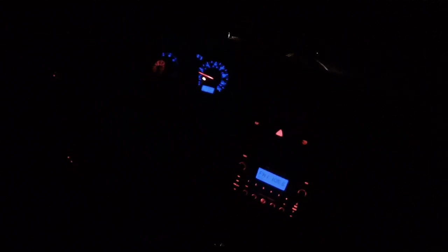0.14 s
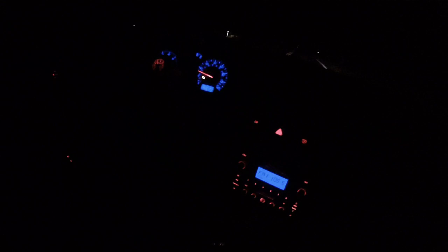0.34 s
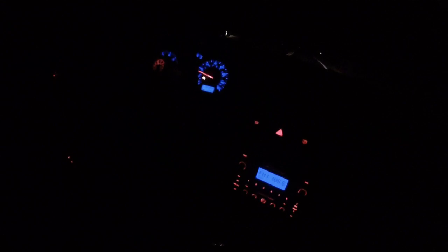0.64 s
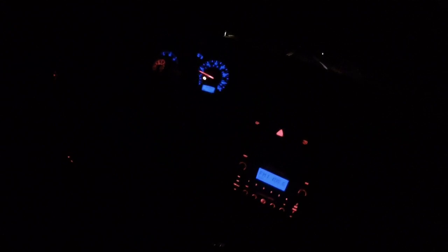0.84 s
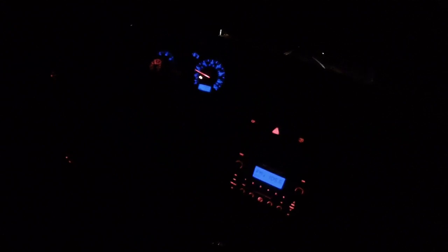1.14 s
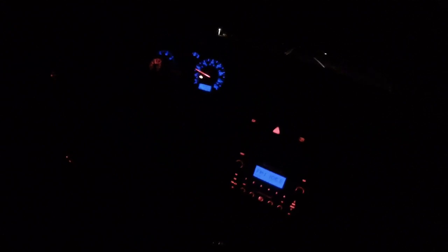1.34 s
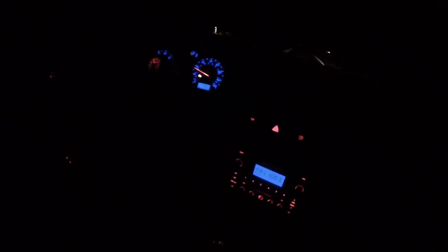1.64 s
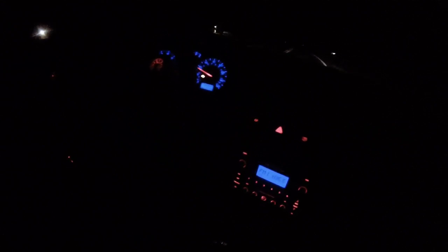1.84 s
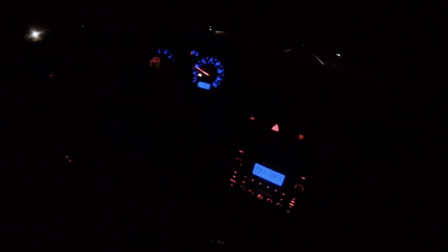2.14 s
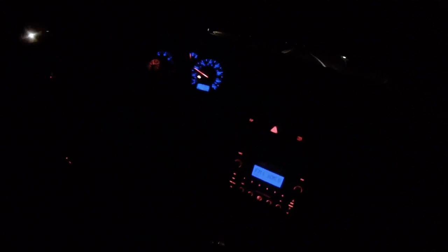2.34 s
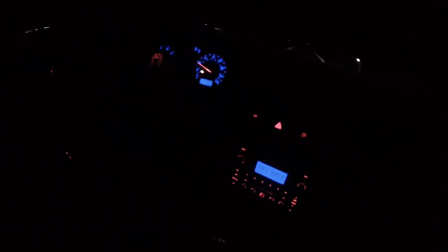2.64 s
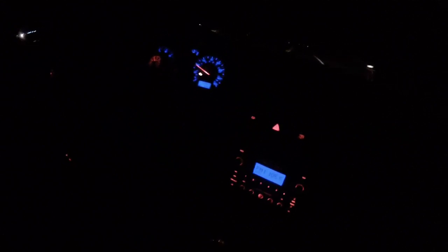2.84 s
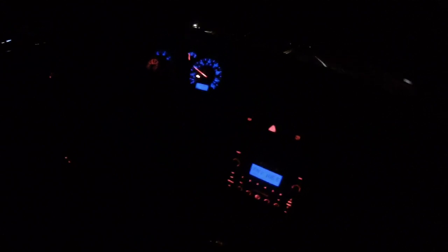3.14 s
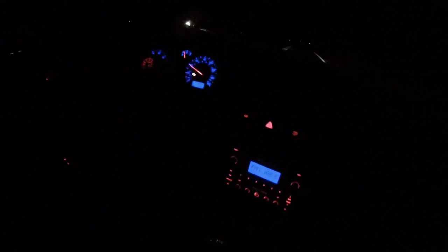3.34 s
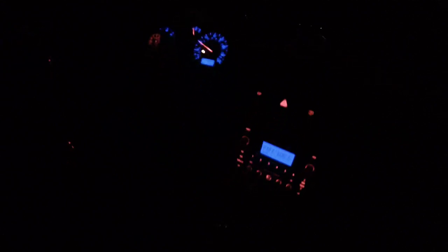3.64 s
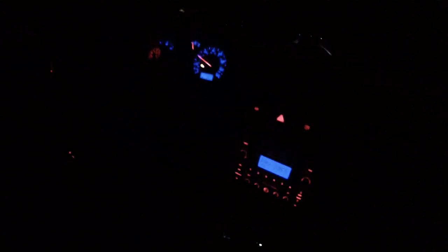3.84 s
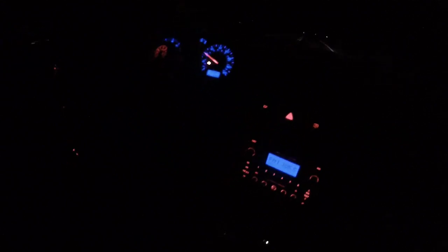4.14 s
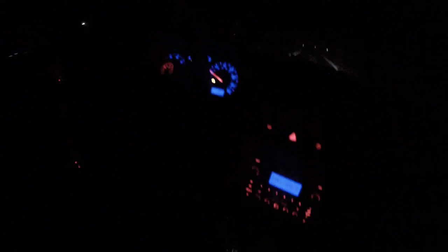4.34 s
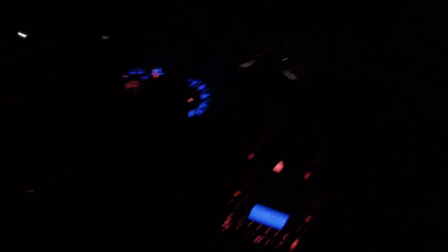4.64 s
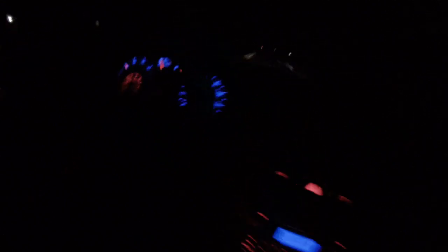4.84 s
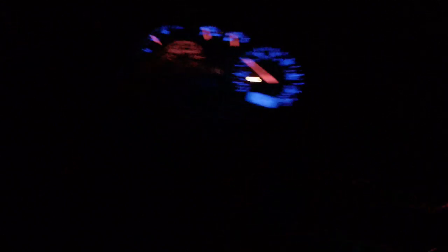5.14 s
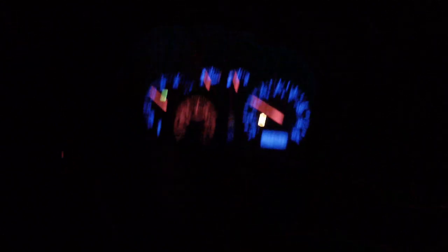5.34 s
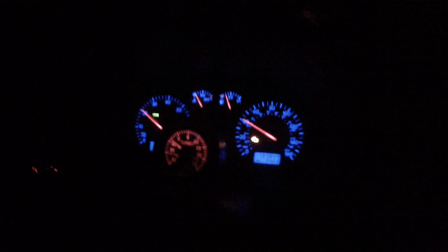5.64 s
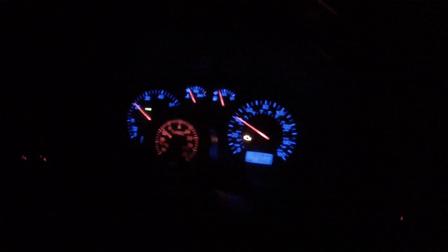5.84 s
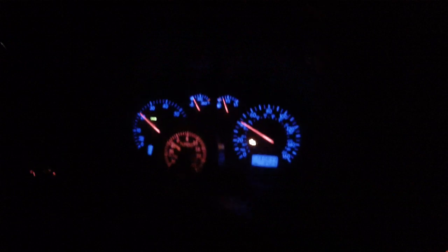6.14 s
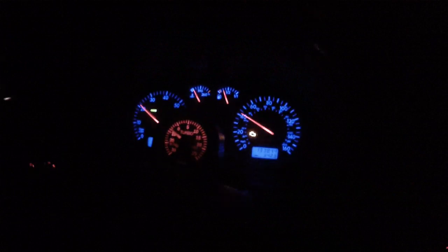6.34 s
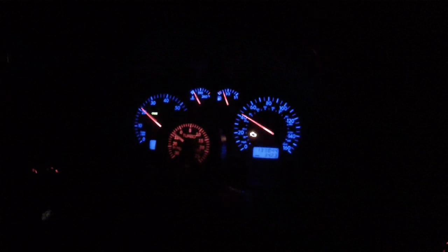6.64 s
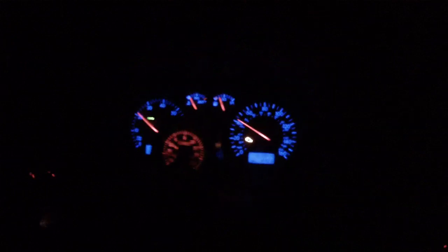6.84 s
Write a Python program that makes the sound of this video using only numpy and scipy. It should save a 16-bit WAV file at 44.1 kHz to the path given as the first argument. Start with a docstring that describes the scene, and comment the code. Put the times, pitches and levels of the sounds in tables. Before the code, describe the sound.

A turbocharged car engine drones inside the cabin, rising in pitch, dropping for a gear change, then pulling again over road rumble.

```python
"""A turbocharged four-cylinder engine drones and booms, heard inside the car at night. It pulls up through
a gear, falls away for the shift, blips and pulls again; its second harmonic excites the cabin's air
resonance. Wheels rumble, air rushes, trim rattles and creaks by stick-slip friction, and the turbo whistles
faintly. A small recorder overloads a little and holds each of its samples, which adds a thin whine."""
import sys
import numpy as np
from scipy import signal
from scipy.fft import rfft, irfft
from scipy.io import wavfile

SR = 44100
rng = np.random.default_rng(int(sys.argv[2]) if len(sys.argv) > 2 else 0)


def log_audio(samples):
    """Write samples as a 16-bit WAV file to the path given in sys.argv[1]."""
    # one column per channel
    frames = np.atleast_2d(samples).T
    # limit to full scale, then quantise
    limited = np.clip(frames, -1, 1)
    pcm = np.round(limited * 32767).astype(np.int16)
    wavfile.write(sys.argv[1], SR, pcm)


N = 307818
T = np.arange(N) / SR


def amp(db):
    """Converts decibels to an amplitude ratio."""
    return 10 ** (np.asarray(db) / 20)


def unit(x):
    """Normalises to rms 1."""
    return x / np.sqrt(np.mean(x ** 2) + 1e-20)


def curve(points):
    """Linear interpolation of (time [s], value) points over the scene."""
    return np.interp(T, *np.transpose(points))


def colour(x, spectrum, skirt_db_per_octave=-36):
    """Spectral shaping by (frequency [Hz], relative level [dB]) points, falling off outside them; rms 1."""
    points_hz, db = np.transpose(spectrum)
    hz = np.fft.rfftfreq(len(x), 1 / SR) + 1e-3
    octaves_outside = np.maximum(np.log2(hz / points_hz[-1]), 0) + np.maximum(np.log2(points_hz[0] / hz), 0)
    gain_db = np.interp(np.log(hz), np.log(points_hz), db) + skirt_db_per_octave * octaves_outside
    return unit(irfft(rfft(x) * amp(gain_db), len(x)))


def wander(rate_hz):
    """Low-pass noise: a slow random fluctuation, rms 1."""
    hz = np.fft.rfftfreq(N, 1 / SR)
    return unit(irfft(rfft(rng.standard_normal(N)) / (1 + (hz / rate_hz) ** 4), N))


def resonate(x, hz, width_hz):
    """Two resonators in cascade, centred on a steady or gliding frequency; rms 1."""
    carrier = np.exp(2j * np.pi * np.cumsum(hz * np.ones(len(x))) / SR)
    pole = np.exp(-np.pi * width_hz / SR)
    baseband = signal.lfilter([(1 - pole) ** 2], [1, -2 * pole, pole * pole], x / carrier)
    return unit((carrier * baseband).real)


def clicks(per_s, spread_db):
    """A Poisson process: random impulses of unequal size."""
    size = amp(spread_db * np.minimum(rng.exponential(1, N), 4))
    return size * rng.choice([-1, 1], N) * (rng.random(N) < per_s / SR)


def add(mix, start_s, sound):
    """Superposes a sound on the mix from start_s on."""
    part = mix[max(round(start_s * SR), 0):][:len(sound)]
    part += sound[:len(part)]


def resonance_db(hz, centre_hz, width_hz, peak_db):
    """Gain in dB near a resonance, as a Lorentzian bell."""
    return peak_db / (1 + (2 * (hz - centre_hz) / width_hz) ** 2)


def exhaust_levels(firing_hz, above_cruise_hz, open_s=0.062, shut_s=0.18):
    """Throb, boom and growl in dB: power follows the load, and under load a cabin mode lifts the boom."""
    # throttle presses: (opens [s], shuts [s], throb at cruise [dB], boom before resonance [dB],
    # boom decay [dB/s], growl at cruise [dB])
    presses = [(-.2, 3.3, -12, -27, 0, -14), (4.06, 4.17, -19, -33, -6, -25),
               (4.25, 7.2, -13, -28.5, 2.5, -18)]
    cabin_db = resonance_db(2 * firing_hz, centre_hz=128.9, width_hz=65, peak_db=20)
    power = amp([[-24], [-27], [-26.5]]) ** 2 * np.ones(N)  # throb, boom and growl while coasting
    for opens, shuts, throb_db, boom_db, decay_db_per_s, growl_db in presses:
        load = np.clip((T - opens) / open_s, 0, 1) * np.clip(1 - (T - shuts) / shut_s, 0, 1)
        loaded_db = [throb_db - 0.2557 * above_cruise_hz,  # the exhaust softens as the revs climb
                     boom_db + cabin_db - decay_db_per_s * (T - opens),
                     growl_db - 0.1466 * above_cruise_hz]
        power += load ** 2 * (amp(loaded_db) ** 2 - power)
    return 10 * np.log10(power)


def engine(phase, firing_hz, throb_db, boom_db, growl_db, shake=0.052, waver=0.17):
    """Periodic firing gives two strong harmonics, and weaker orders that swell at panel resonances."""
    # weak orders, the halves from unequal cylinders: (multiple of firing rate [1], level re growl [dB])
    overtones = [(1.5, -22.5), (2.5, -29.5), (3, -16.5), (3.5, -29.5), (4, -19.5), (4.5, -32.5), (5, -27.5),
                 (5.5, -29.5), (6, -33.5), (6.5, -33.5), (7, -41), (7.5, -35)]
    # cabin panel resonances: (frequency [Hz], width [Hz], peak gain [dB])
    panels = [(119, 20, 7), (218.4, 20, 7), (266.3, 22, 5.5), (430.5, 54, 8)]
    throb = amp(throb_db) * (1 + shake * wander(4.6)) * np.sin(phase)
    boom = amp(boom_db) * (1 + shake * wander(6.4)) * np.sin(2 * phase)
    growl = np.zeros(N)
    for order, db in overtones:
        hz = order * firing_hz
        lift_db = sum(resonance_db(hz, *panel) for panel in panels)
        lag = np.pi * hz / 215  # the cabin's resonances turn the phase of the upper orders, the more the higher they lie
        tone = np.sin(order * phase - lag + waver * wander(7)) * (1 + waver * wander(7))
        growl += amp(db + lift_db) * tone
    return np.sqrt(2) * (throb + boom + amp(growl_db) * growl)


def wheel_rumble(pace, bump_sigma_s=0.088):
    """Forced vibration: wheels shake the body, more with pace, on uneven tarmac and over bumps."""
    # bumps in the road: (time [s], level [dB])
    bumps = [(2.24, -21), (2.64, -22), (3.2, -14)]
    # rumble spectrum: (frequency [Hz], relative level [dB])
    spectrum = [(8, -32), (16, -9.5), (24, 3.5), (32, -8), (45, -7), (60, -11.5), (100, -44)]
    uneven_db = 2 * wander(2.6)
    rolling = amp(-24 + 7 * pace + uneven_db)
    jolts = sum(amp(db) * np.exp(-.5 * ((T - s) / bump_sigma_s) ** 2) for s, db in bumps)
    return np.hypot(rolling, jolts) * colour(rng.standard_normal(N), spectrum)


def roar(phase, pace, above_cruise_hz, pulsing=0.12):
    """Broadband noise, modulated by each firing: tyres roar with pace, the engine block with revs."""
    # roar spectrum: (frequency [Hz], relative level [dB])
    spectrum = [(35, -12), (60, -10), (130, 4), (160, -4.5), (185, -8), (235, -5.5), (310, -12),
                (430, -13.5), (540, -18.5), (670, -16.5), (870, -33), (1025, -30), (1160, -37), (1400, -54)]
    level_db = -24 + 4 * pace + 0.0686 * above_cruise_hz
    noise = rng.standard_normal(N) * (1 + pulsing * np.cos(phase))
    return amp(level_db) * colour(noise, spectrum)


def air_rush(phase, pulsing=0.1, flutter_db=0.8, gain_db=0.67):
    """Turbulence of intake and wind: noise that pulses with the firing and flutters a little."""
    # level of the rush, which grows louder late in the scene: (time [s], level before gain_db [dB])
    levels = [(0, -48.5), (1, -51), (3.2, -47.5), (4.45, -46.5), (5.1, -42), (6.98, -41)]
    # airflow spectrum: (frequency [Hz], relative level [dB])
    spectrum = [(500, -14.5), (900, -8), (1450, 2), (2100, -3.5), (2800, -10), (3600, -14), (5000, -16.5),
                (5800, -32.5)]
    turbulence = rng.standard_normal(N) * (1 + pulsing * np.cos(phase)) * amp(flutter_db * wander(30))
    return amp(curve(levels) + gain_db) * colour(turbulence, spectrum)


def dashboard_buzz(phase, above_cruise_hz, pulsing=0.075, clump_db=1.0, settle_s=5):
    """Impact noise: the engine shakes loose trim, harder with revs; late on the buzz settles a little."""
    # buzz spectrum: (frequency [Hz], relative level [dB])
    spectrum = [(900, -10), (1900, -7.5), (2400, -5), (2750, -3.5), (2920, -1.5), (3150, -5), (3600, -13),
                (3850, -10), (4030, -7.5), (4300, -12.5), (5100, -17), (5900, -34)]
    chatter = clicks(per_s=6000, spread_db=1.5)
    impacts = chatter * (1 + pulsing * np.cos(phase)) * amp(clump_db * wander(22))
    settled = np.clip((T - settle_s) / .3 + .5, 0, 1)
    level_db = -47.5 + 0.1431 * above_cruise_hz + .5 * wander(3.5) - 2.5 * settled
    return amp(level_db) * colour(impacts, spectrum)


def turbo_hiss(growl_db, lag_s=.45, relative_db=-45):
    """Flow noise of the turbo, which spools up and down behind the load with a first-order lag."""
    # hiss spectrum: (frequency [Hz], relative level [dB])
    spectrum = [(3000, -15.5), (4300, -2.5), (5000, -0.5), (5600, -3.5), (5900, -8.5)]
    pole = np.exp(-1 / (lag_s * SR))
    boost_db = growl_db[0] + signal.lfilter([1 - pole], [1, -pole], growl_db - growl_db[0])
    return amp(boost_db + relative_db) * colour(rng.standard_normal(N), spectrum)


def trim_creaks():
    """Stick-slip friction: runs of tiny slips scrape a plastic panel and excite its resonance."""
    # creaks: (time [s], duration [s], ring level [dB], ring frequency [Hz], scrape level [dB])
    creaks = [(.28, .1, -54.5, 2880, -56), (1.165, .05, -48, 2990, -57), (1.266, .07, -52, 3980, -55.5),
              (1.417, 0.055, -53, 2900, -50.5), (2.837, .08, -51, 3000, -53.5),
              (4.666, .07, -51, 2960, -53), (4.976, 0.065, -43.5, 3800, -37.5),
              (5.027, .05, -43.5, 3890, -37), (5.058, .04, -45.5, 3902, -48),
              (5.34, .035, -52.5, 3870, -59)]
    out = np.zeros(N)
    slips = clicks(per_s=1800, spread_db=2.5)
    scrape = colour(slips, [(700, -4), (1300, 0), (2900, -3), (4500, -12), (5800, -17)])
    for start, duration, ring_db, hz, scrape_db in creaks:
        part = slice(round(start * SR), round((start + duration) * SR))
        ring = amp(ring_db) * resonate(slips[part], hz, width_hz=480)
        creak = ring + amp(scrape_db) * unit(scrape[part])
        add(out, start, creak * signal.windows.tukey(len(creak), .5))
    return out


def turbo_whistles():
    """Narrow-band noise with a gliding centre: short, breathy whistles of the turbo under boost."""
    # whistles: (time [s], duration [s], level [dB], start frequency [Hz], end frequency [Hz])
    whistles = [(.78, .26, -58.5, 5700, 5560), (1.0, .2, -59.5, 5440, 5400), (1.25, .22, -63, 5660, 5600),
                (1.68, .26, -65.5, 5600, 5660), (6.44, 0.16, -62, 5540, 5570),
                (6.53, 0.11, -53.5, 5500, 5440)]
    out = np.zeros(N)
    for start, duration, db, start_hz, end_hz in whistles:
        count = round(duration * SR)
        tone = resonate(rng.standard_normal(count), np.linspace(start_hz, end_hz, count), width_hz=130)
        add(out, start, amp(db) * tone * signal.windows.tukey(count, .5))
    return out


def trim_tick(decay_s=0.00061):
    """A heavily damped free vibration: one sharp click of the trim."""
    # click: (time [s], initial level [dB], frequency [Hz])
    ticks = [(3.846, -28.5, 4830)]
    out = np.zeros(N)
    t = T[:400]
    for start, db, hz in ticks:
        add(out, start, amp(db) * np.exp(-t / decay_s) * np.sin(2 * np.pi * hz * t))
    return out


def scene(cruise_hz=70):
    """Superposition of all sources at one microphone in the cabin."""
    # engine speed climbs, falls with the clutch down, blips, climbs slowly: (time [s], firing rate [Hz])
    engine_speed = [(0, 65.59), (1.88, 76.89), (3.35, 85.7), (3.6, 79.3), (4, 63.85), (4.13, 64.6),
                    (4.22, 72.84), (4.35, 67.52), (6.98, 72.81)]
    # the car gathers pace in each gear and coasts between: (time [s], share of the rise in speed [1])
    road_speed = [(0, 0.19), (3.3, 0.95), (4.3, 0.68), (6.98, 1)]
    firing_hz, pace = curve(engine_speed), curve(road_speed)
    above_cruise_hz = firing_hz - cruise_hz
    phase = 2 * np.pi * np.cumsum(firing_hz) / SR  # one cycle per firing
    throb_db, boom_db, growl_db = exhaust_levels(firing_hz, above_cruise_hz)
    cabin = engine(phase, firing_hz, throb_db, boom_db, growl_db)
    cabin += wheel_rumble(pace) + roar(phase, pace, above_cruise_hz) + air_rush(phase)
    cabin += dashboard_buzz(phase, above_cruise_hz) + turbo_hiss(growl_db)
    cabin += trim_creaks() + turbo_whistles() + trim_tick()
    return cabin[None]


def record(dry, hold_hz=12000, cutoff_hz=15300):
    """Soft clipping, then a zero-order hold: spectral images of the drone whine around the hold rate."""
    limited = dry[0] / (1 + dry[0] ** 20) ** (1 / 20)
    faded = limited * signal.windows.tukey(N, .001)
    samples = signal.resample(faded, round(N * hold_hz / SR))
    held = signal.resample(np.repeat(samples, 4), N)
    lowpass = signal.firwin(1023, cutoff_hz, window=("kaiser", 9), fs=SR)
    return signal.oaconvolve(held, lowpass, "same")[None]


dry = scene()
out = record(dry)
log_audio(out)
```